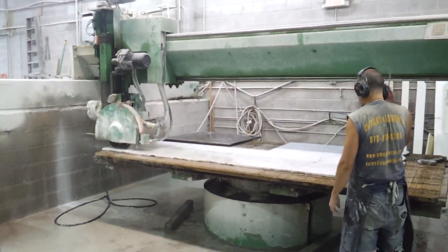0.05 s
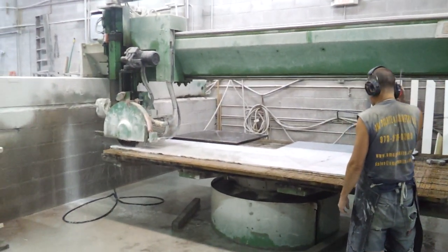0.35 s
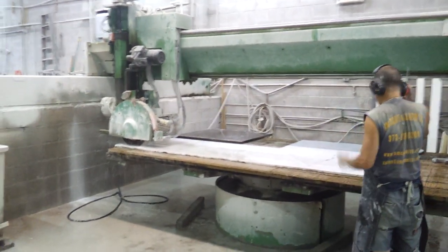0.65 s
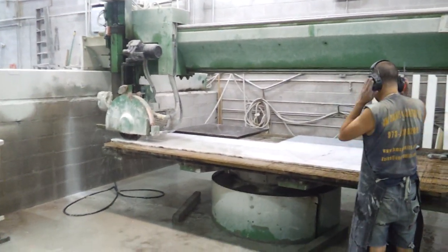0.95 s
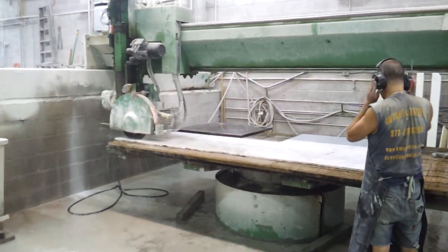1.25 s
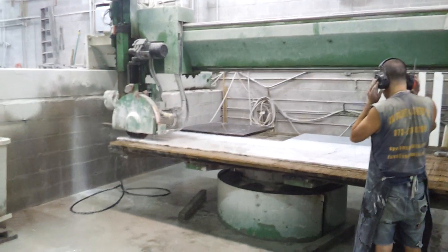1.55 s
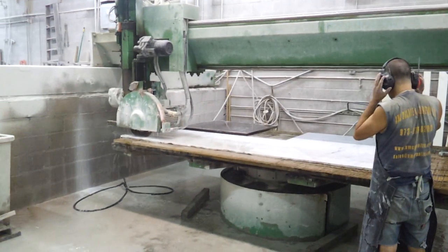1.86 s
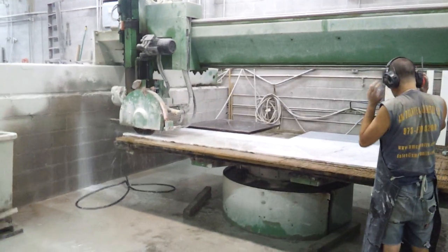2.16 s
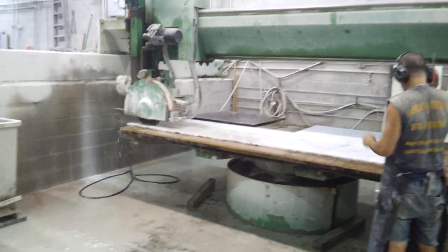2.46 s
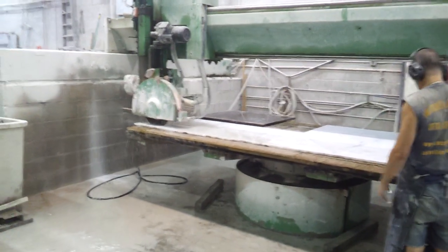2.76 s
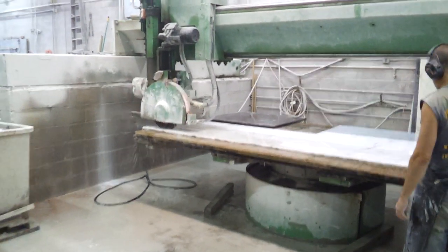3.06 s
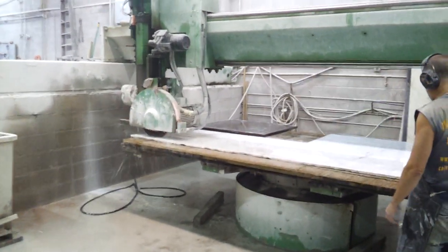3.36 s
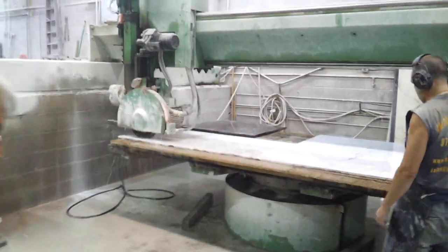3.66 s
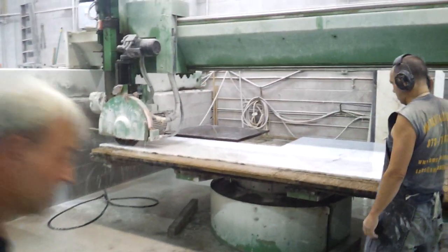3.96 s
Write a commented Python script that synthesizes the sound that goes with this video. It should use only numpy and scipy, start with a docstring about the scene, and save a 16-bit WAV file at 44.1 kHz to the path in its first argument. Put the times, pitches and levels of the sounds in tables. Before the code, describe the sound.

A large saw cuts wet stone with a steady drone, harsh ringing buzz and hiss.

```python
"""A low drone and a harsh, ringing buzz over a steady hiss: a bridge saw is cutting a wet stone slab.
The blade turns about 30 times a second, and its uneven rim scrapes the same pattern on every turn,
which makes a stack of tones. Grit and cooling water make the hiss. The workshop's hard walls give each
tone loud and quiet spots (standing waves), so the tones trade strength as the microphone drifts and
then moves a step."""
import sys
import numpy as np
from scipy import signal
from scipy.fft import irfft
from scipy.io import wavfile
from scipy.ndimage import uniform_filter1d, map_coordinates

SR = 44100
rng = np.random.default_rng(int(sys.argv[2]) if len(sys.argv) > 2 else 0)


def materialize(psi):
    """Save the field psi as 16-bit PCM at rate SR to the path in sys.argv[1].

    A 1-D psi becomes a single channel; in a 2-D psi each row is a channel.
    """
    bounded = np.clip(np.atleast_2d(psi).T, -1, 1)
    quanta = np.round(bounded * 32767).astype(np.int16)
    wavfile.write(sys.argv[1], SR, quanta)


N = 176400
TURN_HZ = 29.919  # turns of the blade each second
TREBLE_FROM_HZ = 3100


def undb(db):
    """Turn decibels into a number to multiply the sound by."""
    return 10 ** (np.asarray(db) / 20)


def curve(rows, at):
    """Join a table's rows with straight lines and read off values."""
    return np.interp(at, *np.array(rows, float).T)


def level_at_pitch(rows, hz):
    """Read levels between a table's pitches, giving every octave equal room."""
    points, db = np.array(rows, float).T
    return np.interp(np.log(np.maximum(hz, 1)), np.log(points), db)


# The microphone's path from its first spot to its second (time [s], share of the way [0-1])
MIC_PATH = [(0, 0), (.8, 0.04), (2.1, .14), (2.6, 0.3), (3.05, .78), (3.4, 0.93), (4, 0.92)]


def blade(t, patches, tone_count=298, samples_per_turn=8192, step_m=.35, waver_db=.8, waver_rad=.1):
    """The rim's scrape repeats every turn, making tones at whole multiples of the turning rate."""
    turn_s = np.arange(int(t[-1] * TURN_HZ) + 2) / TURN_HZ
    hz = TURN_HZ * np.arange(1, tone_count + 1)
    way = curve(MIC_PATH, turn_s)
    metres = way * step_m
    db = drone_and_buzz_db(turn_s, hz, way, metres)
    db += treble_db(turn_s, hz) + contact_db(turn_s, hz, patches)
    db += waver_db * rng.standard_normal(db.shape)  # no two turns are quite alike
    phase = tone_phase(hz, metres) + waver_rad * rng.standard_normal(db.shape)
    tones = undb(db) * np.exp(1j * phase)
    # Add up the tones into one scrape per turn, then blend from each scrape to the next.
    scrapes = irfft(np.pad(tones, ((0, 0), (1, 0))), samples_per_turn) * samples_per_turn / np.sqrt(2)
    turns = t * TURN_HZ
    return map_coordinates(scrapes, [turns, turns % 1 * samples_per_turn], order=1, mode="grid-wrap")


# The strong tones of the blade and its drive
# (multiple of the turning rate, base level at the first spot [dB], base level at the second [dB])
STRONG_TONES = [(2, -42, -41), (3, -47, -43), (6, -50, -48), (7, -38, -36), (9, -43, -47), (10, -44, -38),
                (11, -43, -41), (13, -48, -41), (14, -54, -48), (15, -36, -54), (16, -38, -47),
                (17, -45, -35), (19, -38, -38), (20, -37, -35), (21, -42, -39), (22, -43, -39),
                (23, -53, -37), (24, -30, -39), (25, -55, -51), (26, -40, -43), (27, -35, -39),
                (28, -47, -45), (29, -56, -37), (30, -35, -47), (31, -38, -50), (32, -37, -41),
                (36, -51, -37), (37, -40, -43), (39, -48, -39), (40, -41, -45), (44, -48, -50),
                (45, -53, -46), (48, -37, -46), (51, -42, -48), (61, -38, -46), (63, -46, -40),
                (64, -37, -45), (82, -39, -44), (104, -41, -44), (109, -36, -45), (125, -36, -42),
                (128, -41, -33), (133, -37, -41), (136, -31, -40), (142, -39, -34), (166, -28, -34),
                (171, -26, -33), (182, -32, -33), (184, -36, -33), (212, -42, -37), (214, -38, -38)]
# All the other tones, which fill in the buzz (pitch [Hz], base level of one tone [dB])
BUZZ_LEVELS = [(30, -53), (120, -61.5), (150, -45.5), (240, -50), (750, -43.5), (1050, -49.5),
               (1350, -52.5), (1700, -54.5), (2200, -43), (2450, -45), (2600, -48.5), (3000, -46.5),
               (3500, -43.5), (4500, -37.5), (5450, -34.5), (6500, -42), (7700, -47.5), (8400, -63.5),
               (8900, -80.5)]
# Tones that swell as the microphone passes one of their loud spots
# (multiple of the turning rate, time [s], half length [s], rise [dB])
LOUD_SPOTS = [(24, 2.65, .4, 4), (25, .5, .45, 11), (27, .1, .4, 5), (28, 1.9, .9, 12), (29, .3, .9, 10),
              (31, 3.75, .25, 10), (39, .9, .9, 10), (44, 3.1, .3, 17)]


def drone_and_buzz_db(turn_s, hz, way, metres, uneven_db=2.5, standing_db=2.4):
    """How loud each tone is on each turn, as the microphone moves through the room's standing waves."""
    standing = np.sqrt(2) * room_waves(hz, metres).real
    scatter_db = uneven_db * rng.standard_normal(len(hz)) + standing_db * standing
    # Neighbouring tones trade strength, but together they stay about as loud.
    neighbours_db = 10 * np.log10(uniform_filter1d(undb(scatter_db) ** 2, size=7, axis=1))
    db = level_at_pitch(BUZZ_LEVELS, hz) + .26 + scatter_db - neighbours_db
    for multiple, first_db, second_db in STRONG_TONES:
        db[:, round(multiple) - 1] = first_db + .5 + (second_db - first_db) * way
    for multiple, at_s, half_s, rise_db in LOUD_SPOTS:
        db[:, round(multiple) - 1] += rise_db * np.exp(-((turn_s - at_s) / half_s) ** 2)
    return db


def room_waves(hz, metres, count=12):
    """Each tone bounces in from random directions; its waves add up or cancel from place to place."""
    angle, start = rng.uniform(0, 2 * np.pi, (2, count, 1, len(hz)))
    cycles = metres[:, None] * hz / 343  # sound travels 343 metres a second
    return np.exp(1j * (start + 2 * np.pi * cycles * np.cos(angle))).sum(0) / np.sqrt(count)


def tone_phase(hz, metres, bite_db=-9, drone_top_hz=1300):
    """Where each tone is in its cycle (its phase); the strongest echo shifts it as the listener moves."""
    echo = room_waves(hz, metres, count=1)
    buzz = np.angle(undb(bite_db) * rim_bites(hz) + echo)
    drone = drone_phase(hz) + np.angle(echo / echo[0])
    return np.where(hz < drone_top_hz, drone, buzz)


def drone_phase(hz, scatter_rad=.8):
    """The room spreads the low tones over the whole turn, so they churn and hardly throb."""
    golden = (np.sqrt(5) - 1) / 2  # this ratio keeps the tones from peaking together
    return np.pi * golden * (hz / TURN_HZ) ** 2 + scatter_rad * rng.standard_normal(len(hz))


def rim_bites(hz, count=6, ring_hz=5387, travel_s=.03):
    """Bumps on the rim strike once a turn. Steel carries highs faster, so each is a falling chirp."""
    at_s = rng.uniform(0, 1 / TURN_HZ, (count, 1))
    # travel_s is the trip through the steel at ring_hz, the blade's main ringing pitch.
    delay_s = at_s + 2 * travel_s * np.sqrt(ring_hz / hz)
    return np.exp(-2j * np.pi * hz * delay_s).sum(0) / np.sqrt(count)


# The hiss of grit and water spray (pitch [Hz], base level [dB per Hz])
HISS_LEVELS = [(30, -74), (120, -71.5), (450, -70), (800, -67.5), (1050, -68), (1700, -65.5), (2300, -67),
               (2750, -66.5), (3500, -66.5), (4500, -57.5), (5400, -54), (6500, -57.5), (7700, -63),
               (8100, -65.5), (8400, -72.5), (8900, -89.5)]


def grit_and_water(t, patches, segments=24, pulse_db=1.2):
    """Grit and spray hiss, pulsing with a new strength as each segment of the rim bites."""
    bites = rng.standard_normal(int(t[-1] * TURN_HZ + 2) * segments)
    pulse = undb(pulse_db * map_coordinates(bites, [t * TURN_HZ * segments], order=1))
    noise = rng.standard_normal(N) * pulse / np.sqrt(np.mean(pulse ** 2))
    hz, frame_s, spectra = signal.stft(noise, SR, nperseg=1024)  # split the noise by pitch and time
    db = level_at_pitch(HISS_LEVELS, hz) + .12 + treble_db(frame_s, hz) + contact_db(frame_s, hz, patches)
    return signal.istft(spectra * undb(db).T, SR)[1][:N] * np.sqrt(SR / 2)


# The slow drift of the cut's treble, its high pitches (time [s], level [dB])
TREBLE_DRIFT = [(0, 0.6), (1.2, -.4), (2.5, 1.14), (3.3, 1), (4, 0.3)]
# Narrow bands of the grinding that ring out (+) or sink (-) for a while
# (pitch [Hz], half width [Hz], time [s], half length [s], change [dB])
RINGING_BANDS = [(1446, 130, 3.8, .3, 5), (1900, 66, 2.55, .4, 4.5), (2100, 90, 3.8, 0.27, -2),
                 (2280, 130, .5, .8, 1.5), (2620, 170, 1.7, 0.49, -4.5), (2850, 53, 1.0, .3, 5.5),
                 (3100, 130, 3.9, .3, 4), (3670, 70, 3.3, .3, 3), (3700, 70, 1.85, .35, -3),
                 (3830, 45, 0.53, 0.23, 7.5), (4040, 100, 1.7, 0.62, 3.5), (4260, 69, 1.45, 0.53, 7),
                 (4550, 120, 3.4, .3, 1.5), (4820, 80, 3.15, 0.27, 3.5), (5340, 150, 3.26, 0.21, 4),
                 (5490, 80, 2.55, 0.55, 4), (5730, 70, 3.07, .15, 1), (5780, 130, 1.3, 0.66, 1.5),
                 (6350, 60, .9, .6, 4.5), (6670, 80, 1.4, 0.39, -3), (3830, 45, 3.9, 0.13, 5.5),
                 (2480, 70, 2.4, .4, 2)]


def treble_db(t, hz):
    """The treble drifts as a whole, and each narrow band swells or sinks once."""
    db = np.outer(curve(TREBLE_DRIFT, t), hz > TREBLE_FROM_HZ)
    for centre_hz, half_hz, at_s, half_s, change_db in RINGING_BANDS:
        swell = np.exp(-((t - at_s) / half_s) ** 2)
        band = np.exp(-((hz - centre_hz) / half_hz) ** 2)
        db += change_db * np.outer(swell, band)
    return db


def contact_db(t, hz, patches, wander_db=1.1, width_hz=130, lasts_s=.2):
    """Grit comes and goes in the cut, so narrow bands of buzz and hiss surge and sink together."""
    where = np.meshgrid(t / lasts_s, hz / width_hz, indexing="ij")
    depth = np.minimum(hz / TREBLE_FROM_HZ, 1)  # low pitches wander less
    return wander_db * map_coordinates(patches, where, mode="mirror") * depth


def scene():
    """The blade and the spray sound together from start to end, heard at one microphone."""
    t = np.arange(N) / SR
    patches = rng.standard_normal((256, 256))  # one random map of the grit, shared by both sounds
    return (blade(t, patches) + grit_and_water(t, patches))[None]


def record(dry, mic_top_hz=8950, offset=-.08, clip_at=.78, sharpness=22, top_hz=15800):
    """The microphone misses the highest pitches; its input sits off centre and flattens rare peaks."""
    heard = signal.sosfilt(signal.ellip(10, .1, 70, mic_top_hz, fs=SR, output="sos"), dry)
    shifted = heard + offset
    clipped = shifted / (1 + np.abs(shifted / clip_at) ** sharpness) ** (1 / sharpness)
    return signal.sosfilt(signal.ellip(8, .1, 70, top_hz, fs=SR, output="sos"), clipped)


dry = scene()
out = record(dry)
materialize(out)
```